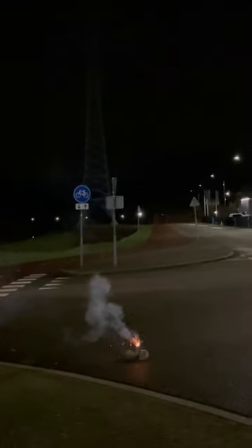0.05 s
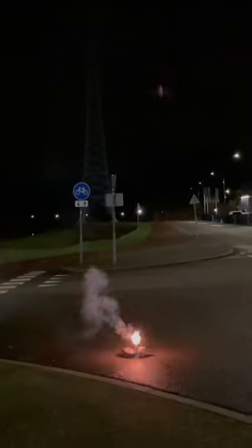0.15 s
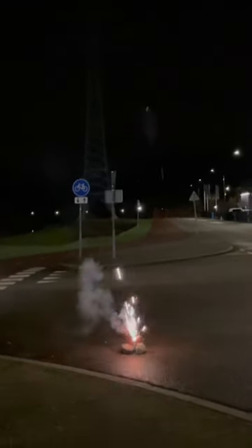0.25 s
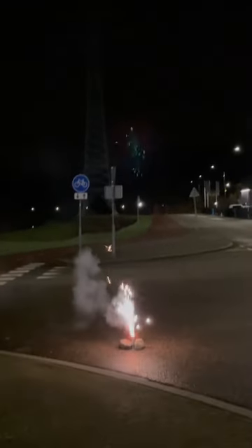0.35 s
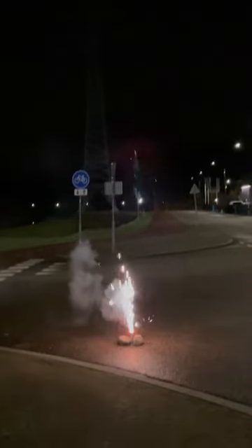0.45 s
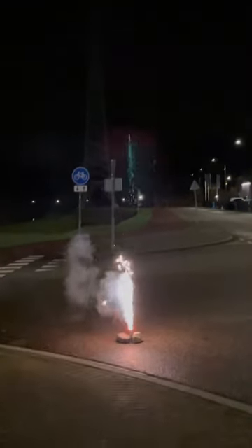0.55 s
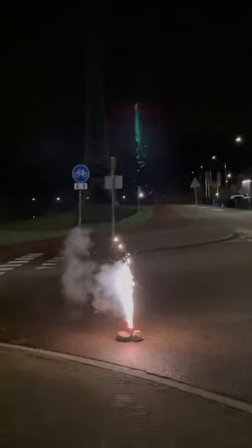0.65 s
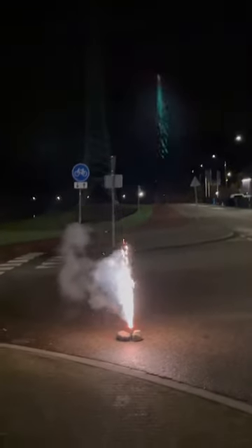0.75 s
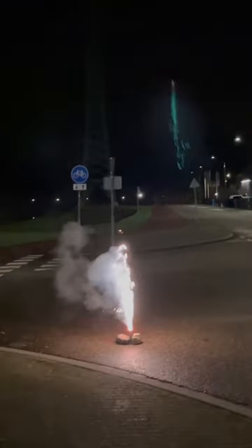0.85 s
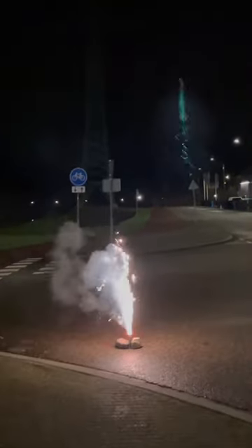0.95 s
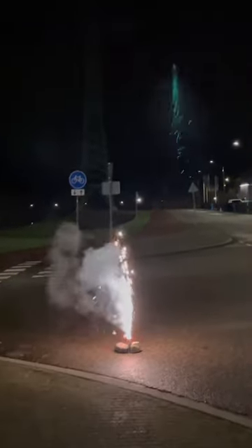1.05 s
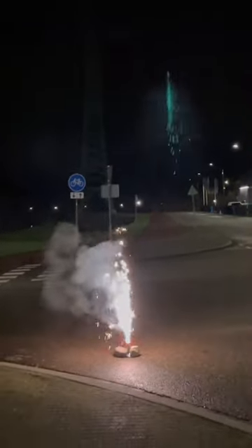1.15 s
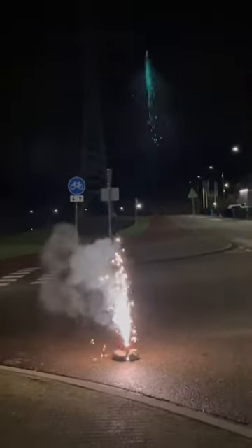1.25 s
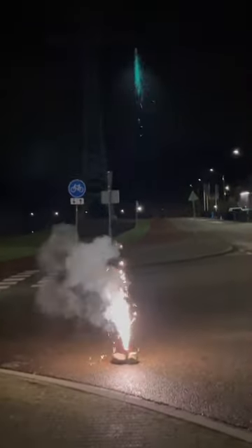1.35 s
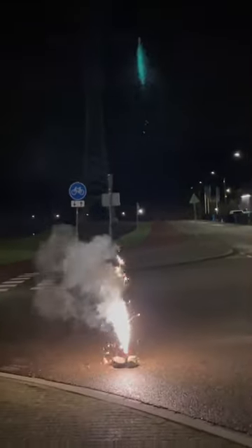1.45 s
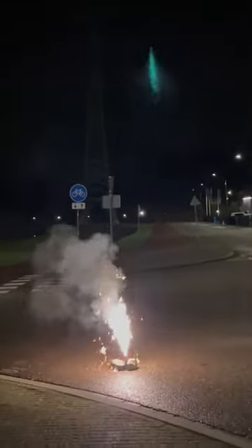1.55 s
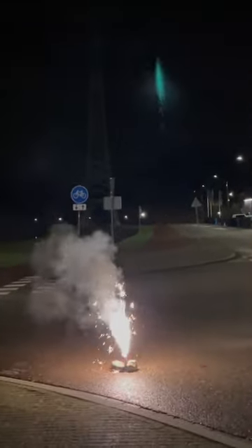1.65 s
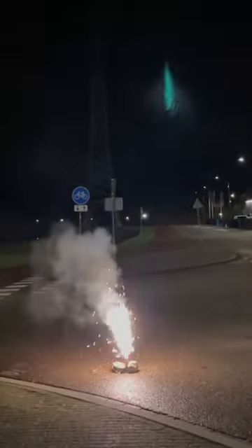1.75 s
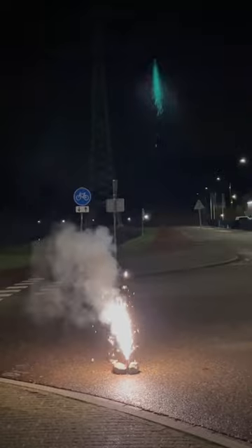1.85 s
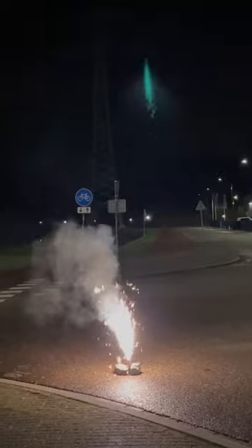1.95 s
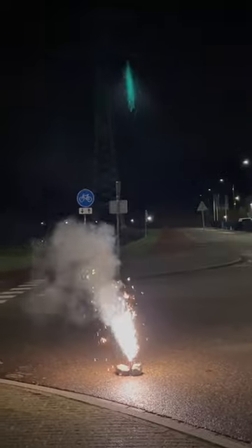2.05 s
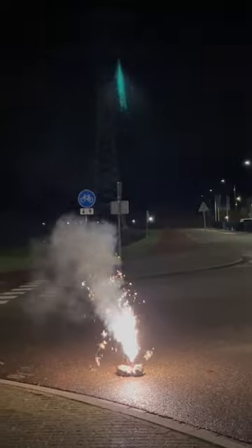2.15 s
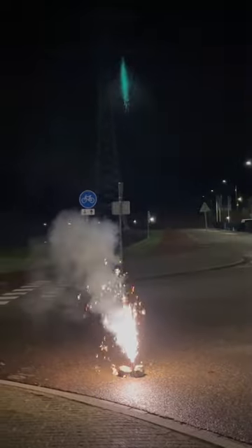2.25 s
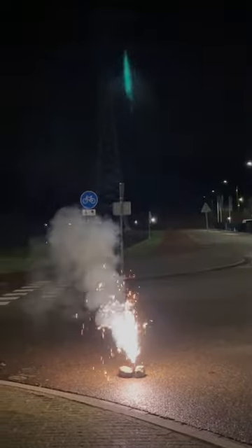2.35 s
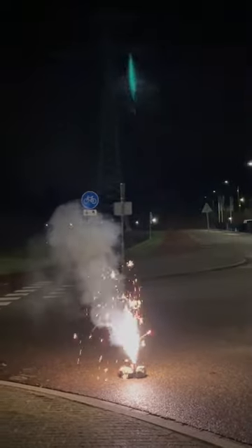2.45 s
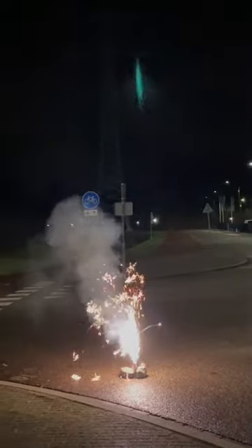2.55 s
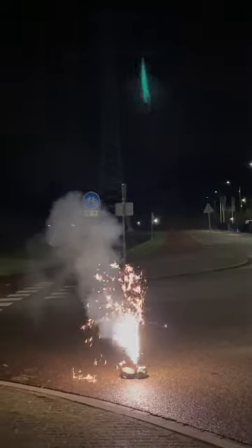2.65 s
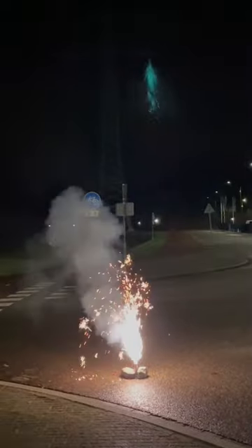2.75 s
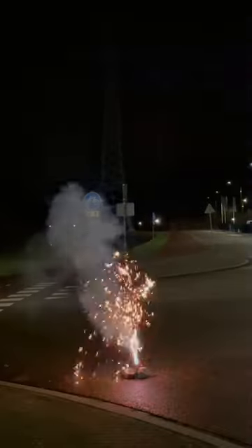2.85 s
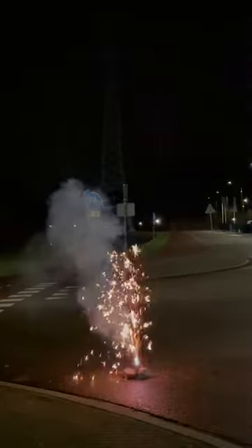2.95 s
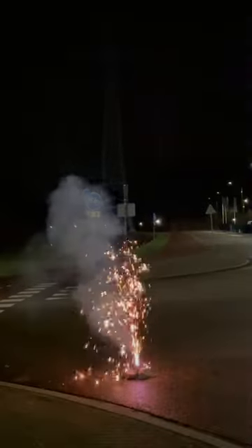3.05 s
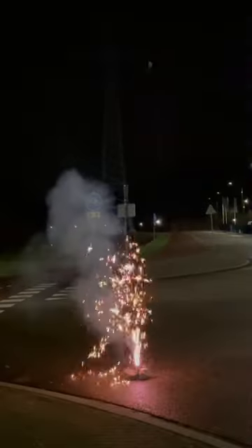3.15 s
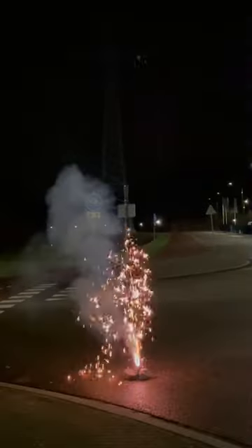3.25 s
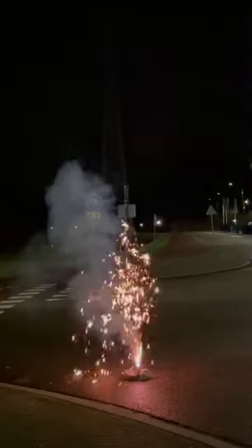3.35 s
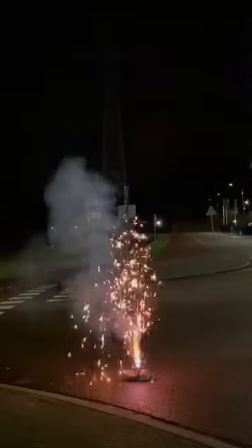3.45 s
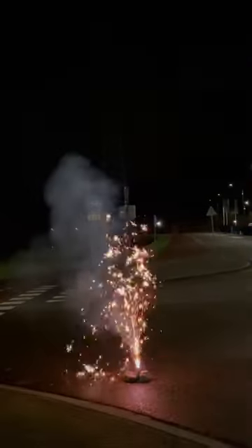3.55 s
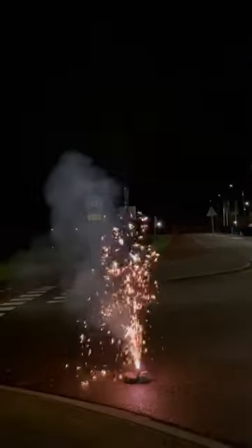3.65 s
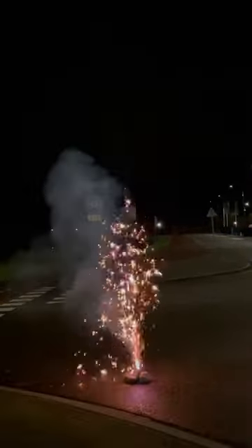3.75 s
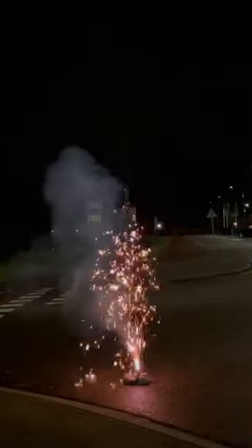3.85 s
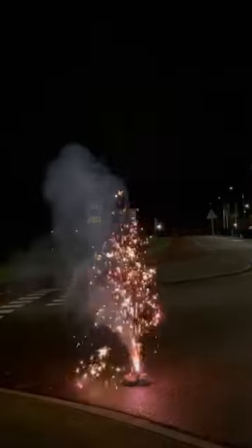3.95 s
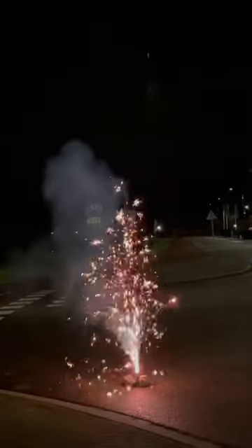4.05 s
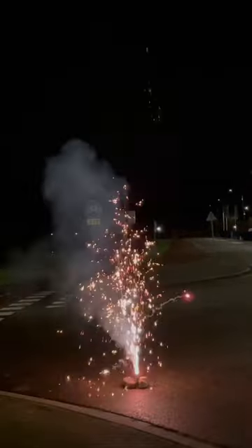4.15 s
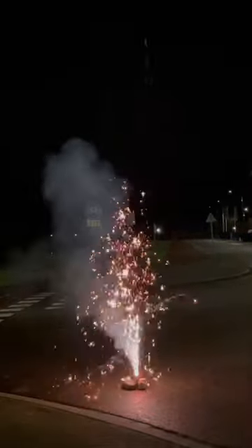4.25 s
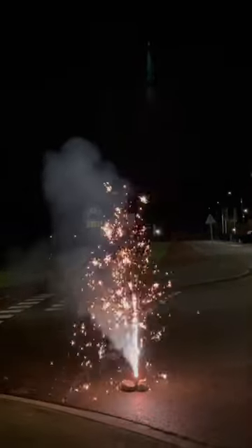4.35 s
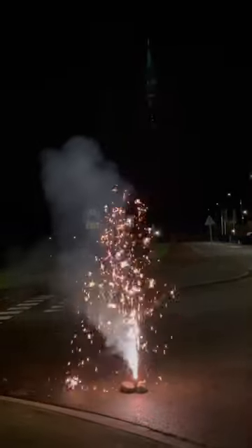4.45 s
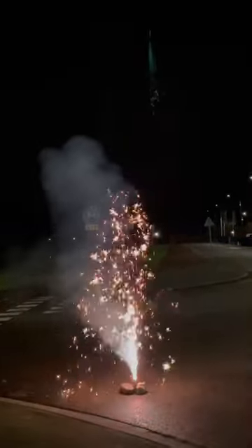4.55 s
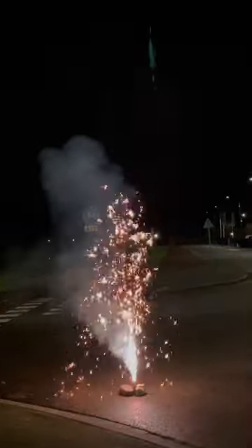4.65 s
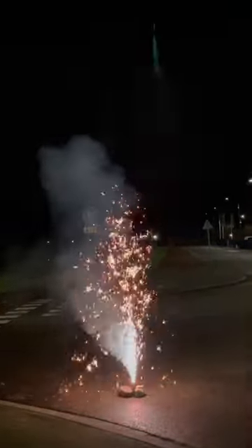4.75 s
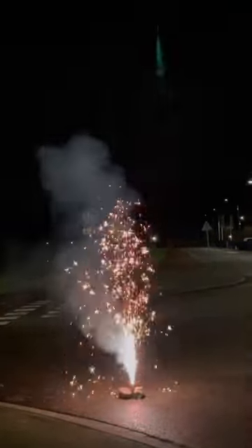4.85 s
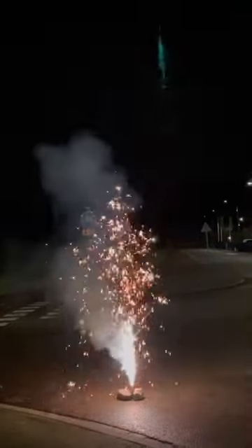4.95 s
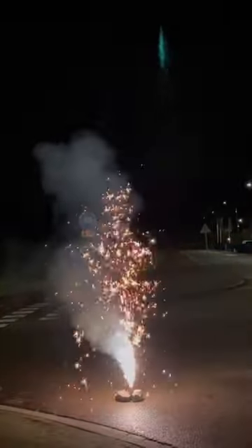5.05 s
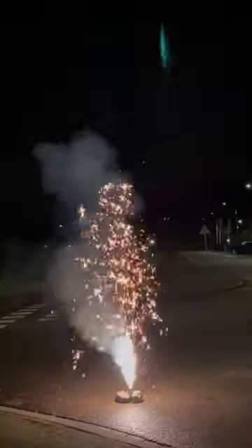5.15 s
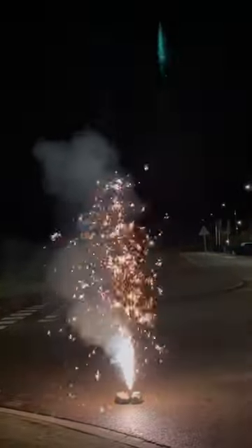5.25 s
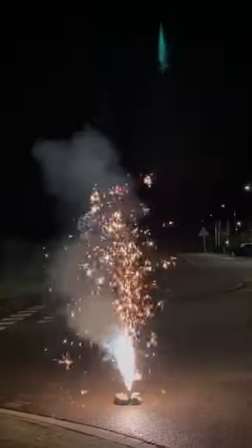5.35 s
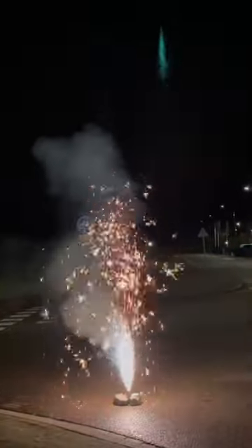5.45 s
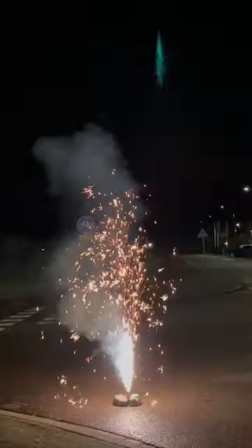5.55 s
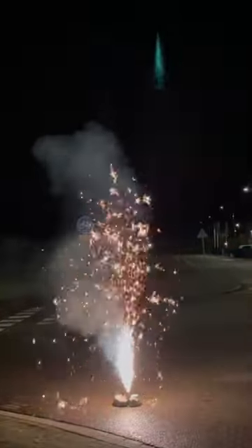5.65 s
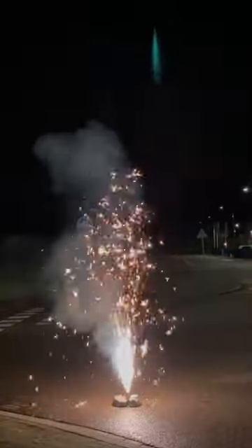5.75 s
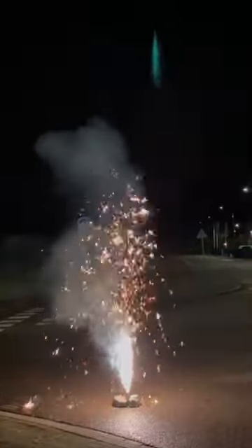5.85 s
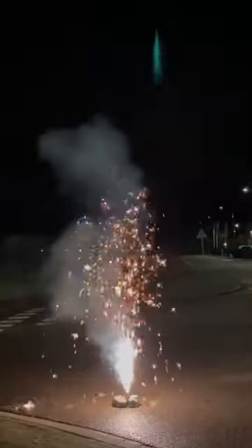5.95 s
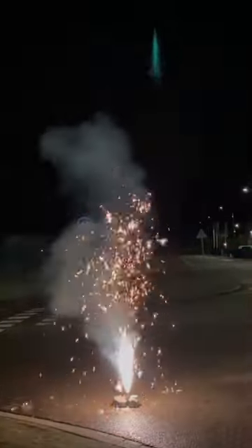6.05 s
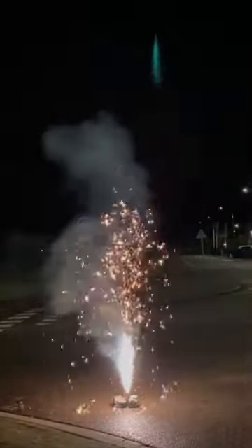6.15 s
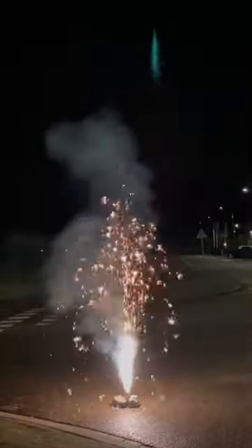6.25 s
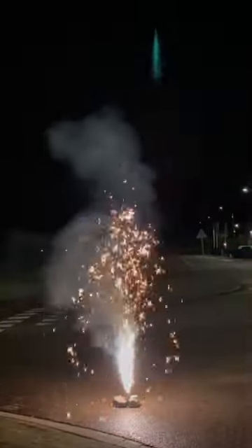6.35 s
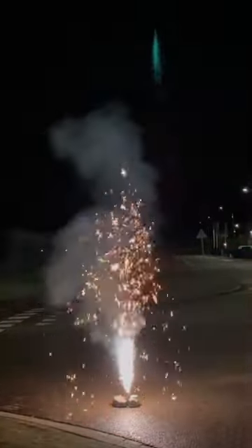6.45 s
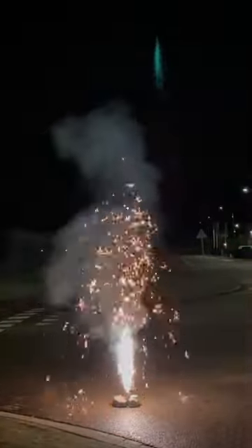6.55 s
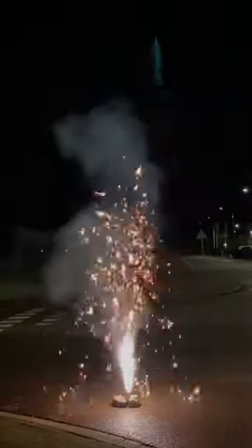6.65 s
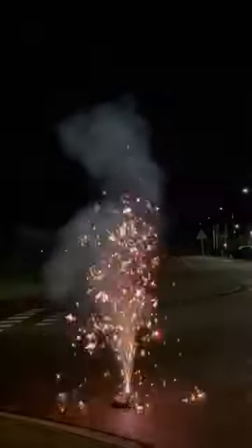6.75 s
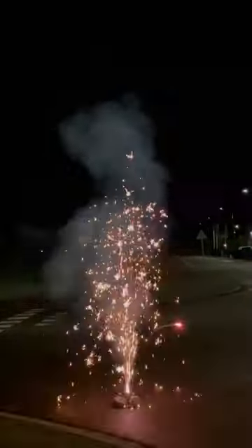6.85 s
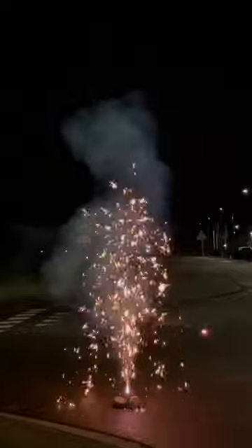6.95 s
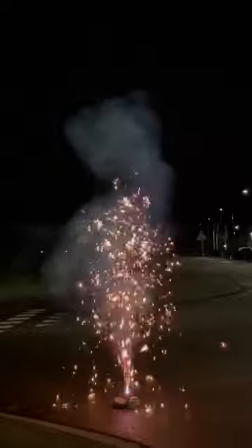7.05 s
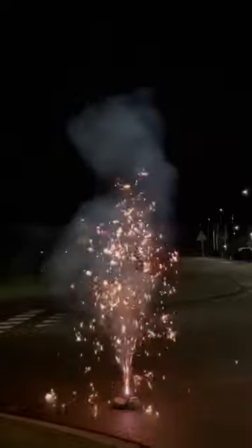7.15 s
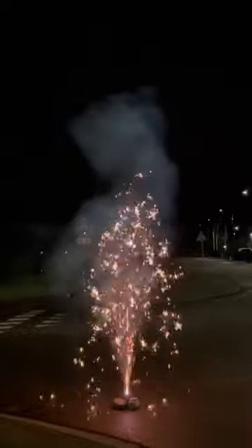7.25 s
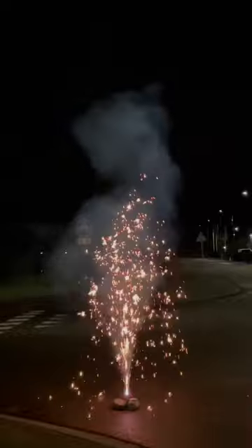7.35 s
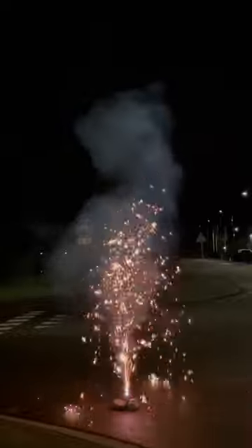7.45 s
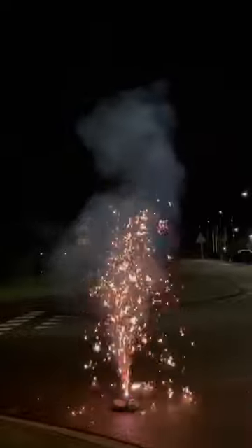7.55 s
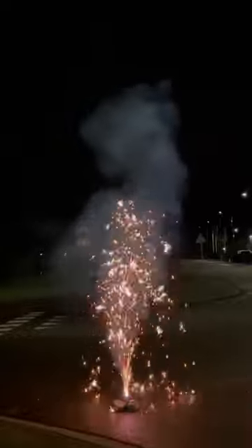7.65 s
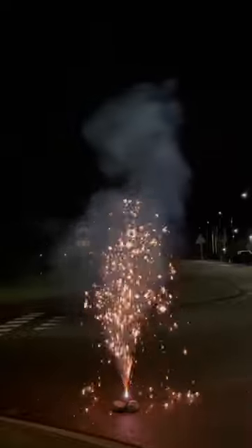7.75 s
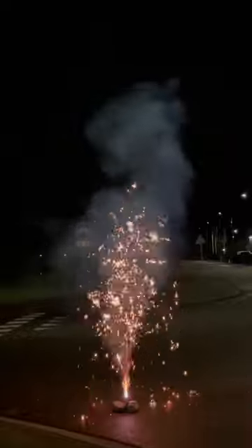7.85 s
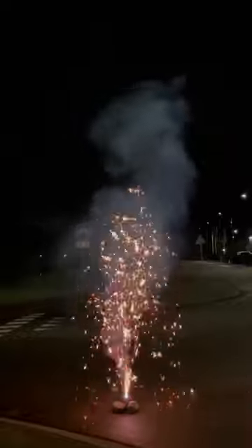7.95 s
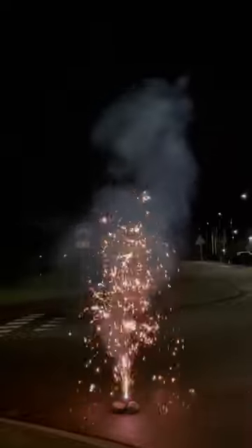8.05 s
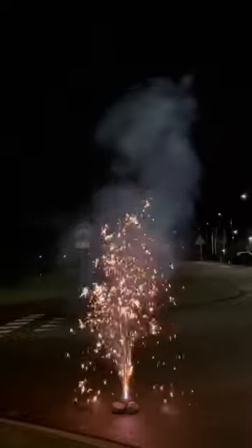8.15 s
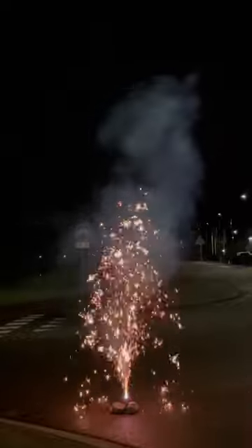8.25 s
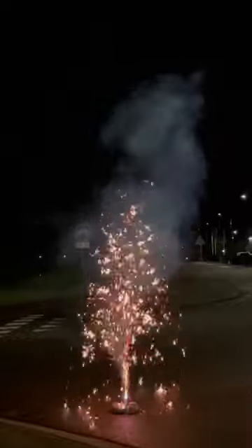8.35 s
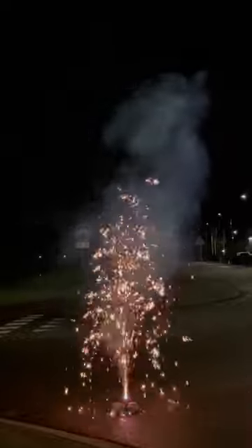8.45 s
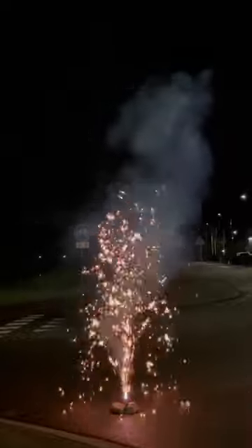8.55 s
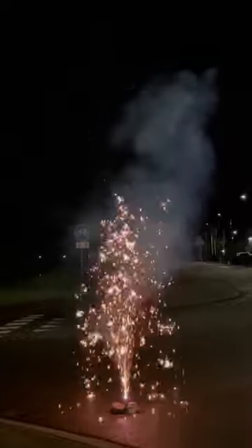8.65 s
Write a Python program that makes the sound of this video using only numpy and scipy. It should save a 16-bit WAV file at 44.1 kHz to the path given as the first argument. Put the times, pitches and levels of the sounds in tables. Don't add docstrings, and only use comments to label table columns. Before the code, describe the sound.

Outdoors at night, a fizzing fountain firework screams twice in falling tones, with a sputter and far low thud between, then hisses on.

```python
import sys
import numpy as np
from scipy import signal
from scipy.fft import rfft, irfft, next_fast_len
from scipy.io import wavfile
from scipy.ndimage import uniform_filter1d

SR = 44100
rng = np.random.default_rng(int(sys.argv[2]) if len(sys.argv) > 2 else 0)


def field_ratio(decibels):
    return 10 ** (np.asarray(decibels, dtype=float) / 20)


def output_pcm(signal):
    pcm = np.clip(np.atleast_2d(signal).T, -1, 1) * 32767
    wavfile.write(sys.argv[1], SR, np.round(pcm).astype(np.int16))


N = 383669
TIME = np.arange(N) / SR


def evened(x):
    return x / np.sqrt(np.mean(np.abs(x) ** 2) + 1e-20)


def read(points, hz):
    f, value = np.transpose(points)
    return np.interp(np.log(hz + 1), np.log(f + 1), value)


def per_hz(colour, lo_hz, hi_hz):
    hz = np.arange(lo_hz, hi_hz)
    return -10 * np.log10(np.sum(field_ratio(read(colour, hz)) ** 2))


def wander(count, hz):
    r = np.exp(-2 * np.pi * hz / SR)
    steps = rng.standard_normal((count, 2)) @ [1, 1j]
    return evened(signal.lfilter([1], np.convolve([1, -r], [1, -r]), steps))


# f/Hz, likeness/0-1
PORT_LIKENESS = [(60, 0.62), (150, 0.88), (380, 0.73), (950, 0.89), (2380, 0.84), (5980, 1), (15000, 1)]


def noise(field_db, size, patchy_db, flicker_db):
    hop = size // 4
    hz = np.fft.rfftfreq(size, 1 / SR)[:, None]
    t = np.arange(N // hop + 5) * hop / SR
    a, b, c, d, patches = rng.standard_normal((len(t), len(hz), 5)).T
    patches = evened(uniform_filter1d(uniform_filter1d(patches, 6, 0), 16, 1))
    flicker = evened(uniform_filter1d(rng.standard_normal(len(t)), 4))
    same = np.clip(read(PORT_LIKENESS, hz), 0, 1)
    left, other = a + 1j * b, c + 1j * d
    z = np.array([left, same * left + np.sqrt(1 - same ** 2) * other])
    level_db = field_db(hz, t) + patchy_db * patches + flicker_db * flicker
    z *= field_ratio(level_db) * np.sqrt(SR / size * 3 / 2)
    return signal.istft(z, nperseg=size, noverlap=size - hop)[1][:, :N]


# t/s, f/Hz, level/dB
KINDLE = [
    [(.45, 6300, -70.5), (.75, 6150, -49), (1.0, 5770, -44), (1.15, 5570, -35.5), (1.29, 5450, -26),
     (1.36, 5340, -30), (1.45, 5120, -28.5), (1.52, 5056, -21), (1.628, 5000, -12.5)],
    [(4.3, 6200, -67.5), (4.6, 5900, -48), (4.82, 5720, -37.5), (5.05, 5510, -30.5), (5.13, 5450, -20.5),
     (5.236, 5190, -20.5), (5.242, 5350, -23), (5.289, 5200, -19.5)],
]
# t/s, f/Hz, level/dB
SING = [
    [(1.634, 5253, -16.5), (1.732, 5036, -12), (1.738, 5087, -12), (2.09, 4730, -11), (2.4, 4400, -14),
     (2.69, 4204, -15), (2.725, 4124, -13.5), (2.798, 4090, -20)],
    [(5.294, 5380, -16), (5.33, 5290, -15.5), (5.8, 4764, -9), (6.27, 4360, -13.5), (6.5, 4158, -13.5),
     (6.6, 4030, -14.5), (6.645, 4020, -17), (6.668, 4023, -29.5), (6.84, 4030, -45)],
]
# level/dB, level/dB, flame falters t/s
STEEPEN = [
    (-21.5, -31.5, 2.745),
    (-13, -22.5, 6.63),
]
STEEP_PER_DB = (0.42, -0.3)
STEEP_DB_PER_KHZ = (-1.5, -11)
# t/s, depth/dB, pitch sag/Hz, length/s
CHOKES = [(1.631, 18, 750, .0022), (1.735, 4, 260, .0015), (2.486, 6, 40, .003), (2.727, 9, 100, .005),
          (2.741, 6, -200, .002), (5.162, 5, 80, .003), (5.218, 6, 100, .002), (5.227, 6, 100, .002),
          (5.239, 10, 250, .002), (5.28, 9, 120, .003), (5.2925, 22, 60, .0028), (5.322, 3, 130, .002),
          (5.405, 3, 110, .002), (5.53, 4, 170, .0025), (5.739, 12, 300, .0025), (6.535, 4, 50, .003),
          (6.614, 5, 60, .003)]
# row of level/dB, row of lock/0-1
LOCKING = (-38, -29, -19), (0, .72, .97)
# row of level/dB, row of wide share/0-1
NARROWING = (-45, -34), (1, .01)


def whistle(kindle, sing, steepen):
    s, hz, db = np.transpose(list(kindle) + list(sing))
    t = TIME[round(s[0] * SR):round(s[-1] * SR)]
    count, sing_s, falter_s = len(t), sing[0][0], steepen[2]
    tube_hz, tone_db = np.interp(t, s, hz), np.interp(t, s, db)

    at, depth_db, sag_hz, length_s = np.transpose(CHOKES)[:, :, None]
    choke_db = (depth_db * np.exp(-((t - at) / length_s) ** 2)).sum(0)
    sag = np.exp(-((t - at + 0.0013) / length_s) ** 2)
    pitch_hz = tube_hz - (sag_hz * sag).sum(0)
    for depth_hz, rate_hz in ((14, 14), (9, 100), (12, 370)):
        pitch_hz = pitch_hz + depth_hz * wander(count, rate_hz).real

    lock = np.where(t > sing_s, 0.99, np.interp(tone_db, *LOCKING))
    wide = np.interp(tone_db, *NARROWING)
    hum = np.sqrt(1 - wide) * wander(count, 140) + np.sqrt(wide) * wander(count, 620)
    wave = (np.sqrt(lock) + np.sqrt(1 - lock) * hum) * field_ratio(-choke_db)
    phase = 2 * np.pi * np.cumsum(pitch_hz) / SR + np.angle(wave)

    soft_db = -5 * ((t < sing_s) + 2.5 * np.clip((t - falter_s) / 0.042, 0, 1))
    levels_db = [tone_db]
    for under_db, grow, tilt in zip(steepen, STEEP_PER_DB, STEEP_DB_PER_KHZ):
        steep_db = under_db + grow * (tone_db + 12) + tilt * (tube_hz - 4600) / 1000
        levels_db.append(tone_db + steep_db + soft_db)
    tone = np.zeros(count)
    for k, level_db in enumerate(levels_db, 1):
        tone += field_ratio(level_db) * lock ** (k - 1) * abs(wave) ** k * np.sin(k * phase)
    out = np.zeros(N)
    out[round(s[0] * SR):][:count] = np.sqrt(2) * tone * np.clip((t[-1] - t) / 0.0053, 0, 1)
    return out


def street(x):
    t = np.arange(SR) / SR
    taps = rng.standard_normal((2, SR)) * (rng.random((2, SR)) < .4)
    taps[1] = 0.52 * taps[0] + 0.5 * taps[1]
    decay = field_ratio(-60 * t / .28) + field_ratio(-16 - 60 * t / 1.15)
    taps *= decay * np.clip((t - .015) / .03, 0, 1)
    dull = signal.lfilter(*signal.butter(N=2, Wn=9000, fs=SR), taps)
    return signal.fftconvolve(x[None], dull / np.linalg.norm(taps[0]), axes=1)[:, :N]


# f/Hz, level/dB per Hz
JET_COLOUR = [(880, -41.5), (1500, -29.5), (1610, -9), (2200, -17), (2580, -6.5), (3600, -3.5), (4020, -3),
              (4350, -1.5), (6640, -11), (8000, -1), (10600, -12.5), (13100, -13), (14600, -24),
              (15800, -36.5)]
# centre f/Hz, low f/Hz, high f/Hz
JET_BANDS = [
    (2850, 2400, 3300),
    (4750, 4300, 5200),
    (7350, 7000, 7700),
    (12300, 11300, 13500),
]
# t/s, level/dB
FOUNTAIN = [(.16, -62), (1.5, -61.5), (1.9, -57), (2.9, -54.5), (3.1, -56), (3.3, -51), (3.8, -49),
            (4.8, -48.5), (5.2, -45.5), (5.35, -53), (6.55, -57.5), (6.7, -48), (7.6, -50), (8.7, -50.5)]
# t/s, level/dB
FLAME = [
    [(.16, -62), (.28, -56), (.5, -61.5), (1.5, -60.5), (1.68, -51.5), (2.1, -56), (2.7, -57), (2.83, -58),
     (2.92, -74)],
    [(3.92, -79), (4.0, -53.5), (4.5, -54), (4.9, -56), (5.25, -53), (5.35, -49.5), (5.9, -51.5),
     (6.62, -51), (6.7, -68.5)],
]
FOUNTAIN_DB = (0, -1, -7, -11)
FLAME_DB = [(0, 7.6, -1.5, 1), (0, 6, -.3, 1.7)]


def jet():
    ripen_db_per_s, ripen_hz = 0.68, 6000

    def balance(hz, row_db):
        log_centres = np.log(np.array(JET_BANDS)[:, 0])
        levels_db = [db + per_hz(JET_COLOUR, lo, hi) for db, (_, lo, hi) in zip(row_db, JET_BANDS)]
        return field_ratio(np.interp(np.log(hz + 1), log_centres, levels_db))

    def field(hz, t):
        ripe_db = ripen_db_per_s * (t - 7) * np.clip(np.log2(hz / ripen_hz + .01) + 1, 0, 1)
        fountain_db = np.interp(t, *np.transpose(FOUNTAIN)) + ripe_db
        power = (balance(hz, FOUNTAIN_DB) * field_ratio(fountain_db)) ** 2
        for flame, row_db in zip(FLAME, FLAME_DB):
            flame_db = np.interp(t, *np.transpose(flame), -120, -120)
            power = power + (balance(hz, row_db) * field_ratio(flame_db)) ** 2
        return read(JET_COLOUR, hz) + 10 * np.log10(power) - np.clip((2000 - hz) / 40, 0, 60)

    hiss = noise(field, size=512, patchy_db=0.75, flicker_db=0.86)
    return hiss * np.clip((TIME - .15) / 0.0033, 0, 1)


# t/s, length/s, level/dB, low f/Hz, high f/Hz
SPITS = [
    (1.158, .06, -43, 1350, 2400),
    (1.158, .06, -50, 650, 1300),
    (2.719, .018, -29, 2800, 5100),
    (2.718, .022, -41, 11000, 14800),
    (2.735, .022, -45, 11000, 14500),
    (2.72, .028, -45, 7200, 10000),
    (2.722, .022, -53, 800, 2200),
    (4.4517, .0006, -39, 700, 10500),
    (1.63, .012, -50, 2500, 14000),
    (6.601, .01, -46, 5000, 15000),
]


def spits():
    out = np.zeros(N)
    for s, length_s, db, lo, hi in SPITS:
        shape = signal.windows.tukey(round(length_s * SR), .5)
        puff = np.pad(rng.standard_normal(len(shape)) * shape, (0, 300))
        band = signal.butter(N=3, Wn=[lo, hi], btype="band", fs=SR, output="sos")
        puff = signal.sosfilt(band, puff)
        out[round(s * SR):][:len(puff)] += field_ratio(db) * evened(puff)
    return out + .7 * np.roll(out, 10)


# f/Hz, width/Hz, level/dB
SPENT = [
    (4030, 87.3, -58),
    (8000, 320, -51.5),
]


def spent():
    spent_s = 6.7
    hum = np.zeros(N)
    for hz, width_hz, db in SPENT:
        fuzzy = (wander(N, width_hz) * np.exp(2j * np.pi * hz * TIME)).real
        hum += field_ratio(db + 5 * wander(N, 4.5).real) * fuzzy * np.sqrt(2)
    return hum * np.clip((TIME - spent_s) / 0.151, 0, 1)


# t/s, peak level/dB, f/Hz, t60/s
THUDS = [(0.829, -36.5, 52.4, 0.21), (2.68, -32, 51.6, 0.19), (2.678, -27, 138, 0.18),
         (2.768, -36, 75, 0.24), (2.815, -26.5, 159, 0.24), (2.838, -26.5, 157, 0.15),
         (2.889, -27.5, 133.5, 0.094), (2.908, -27, 169, 0.15), (2.948, -27.5, 101, 0.097),
         (2.99, -27, 118.6, 0.17), (3.015, -20.5, 154, 0.11), (3.061, -19, 196, 0.081),
         (3.108, -46, 191, 0.15), (3.16, -28, 156, 0.14), (3.228, -37.5, 111.5, 0.14),
         (3.296, -36.5, 181, 0.13), (3.381, -33.5, 155, 0.098), (3.439, -44, 165.4, 0.16),
         (5.757, -40.5, 142, 0.29), (6.127, -36.5, 99, 0.12), (6.429, -37, 51.5, 0.15)]
# t/s, peak level/dB, f/Hz, t60/s
KNOCKS = [
    (2.81, -33.5, 387.6, 0.17),
    (2.835, -30, 326.8, 0.16),
    (2.89, -37, 407, 0.19),
    (3.05, -31, 297, .15),
    (3.3, -30, 169, .15),
]


def thuds():
    out, t = np.zeros(N), np.arange(6000) / SR
    for s, db, hz, t60_s in list(THUDS) + list(KNOCKS):
        decay = field_ratio(db - 0.5 - 60 * t / t60_s)
        out[round(s * SR):][:len(t)] += np.sin(2 * np.pi * hz * t) * decay * np.clip(t / 0.0049, 0, 1)
    return out


# t/s, level/dB
ROLL = [
    (2.66, -40),
    (2.718, -38.5),
    (3.038, -30),
    (3.458, -42.5),
    (4.3, -54.5),
]
# f/Hz, level/dB per Hz
ROLL_COLOUR = [(18, -38.5), (30, -10.5), (167, -2), (245, -13.5), (356, -14), (583, -22), (633, -29),
               (800, -27), (1040, -55), (1760, -120)]


def roll_db(hz, t):
    s, db = np.transpose(ROLL)
    upper_db = -0.9 * np.clip((hz - 200) / 100, 0, 1)
    level_db = np.interp(t, s, db - 4.5, -120, -120)
    return read(ROLL_COLOUR, hz) + per_hz(ROLL_COLOUR, 50, 450) + level_db + upper_db - 60 * (hz > 800)


# t/s, swell/dB
TRAFFIC = [(0, 3.5), (.6, -3), (1, -1.5), (1.6, -2), (3.2, -2.5), (3.9, 3), (5.9, 1.5), (6.8, 0),
           (8.7, -3.5)]
# f/Hz, level/dB per Hz
RUMBLE_COLOUR = [(8.8, -55), (15, -15), (43, -3.5), (75, -5), (137, -5.5), (291, -11), (500, -10),
                 (650, -39), (1100, -120)]
# f/Hz, level/dB per Hz
WASH_COLOUR = [(150, -45), (250, -15), (340, -4.5), (420, -6.5), (798, -3), (1600, -12), (2300, -22.5),
               (2990, -50), (5060, -120)]


def traffic_db(hz, t):
    rumble_db, wash_db, wash_share = -53, -52.5, 0.38
    swell_db = np.interp(t, *np.transpose(TRAFFIC))
    rumble = read(RUMBLE_COLOUR, hz) + per_hz(RUMBLE_COLOUR, 30, 300) + rumble_db + swell_db
    wash = read(WASH_COLOUR, hz) + per_hz(WASH_COLOUR, 600, 1200) + wash_db + wash_share * swell_db
    wash = wash - 9 * np.clip(1 - t / 0.32, 0, 1)
    return rumble - 60 * (hz > 330), wash - 60 * (hz <= 330)


# f/Hz, level/dB per Hz
NIGHT = [(880, -40), (1500, -20.5), (5090, -12), (6130, -11.5), (7110, -21), (14600, -13.5), (15800, -29)]


def town():
    night_db = -62

    def field(hz, t):
        night = read(NIGHT, hz) + per_hz(NIGHT, 1500, 15900) + night_db - 60 * (hz < 1500)
        rumble, wash = traffic_db(hz, t)
        return 10 * np.log10(sum(field_ratio(db) ** 2 for db in (night, rumble, wash, roll_db(hz, t))))

    return noise(field, size=2048, patchy_db=1.5, flicker_db=0.2)


def scene():
    direct = sum(whistle(*charge) for charge in zip(KINDLE, SING, STEEPEN)) + spits()
    return direct + field_ratio(-14.5) * street(direct) + jet() + spent() + thuds() + town()


def masked(x):
    mask_db, slope_db_per_khz = 28, 13.5
    hz, t, z = signal.stft(x, SR, nperseg=2048)
    bands = z[:, :1024].reshape(2, 64, 16, -1)
    index = np.arange(64)[:, None]
    level_db = 10 * np.log10((abs(bands) ** 2).sum((0, 2)) + 1e-20)
    fade_db = slope_db_per_khz * index * 16 * hz[1] / 1000
    reach_db = np.maximum.accumulate(level_db + fade_db, 0) - fade_db - mask_db
    reach_db = np.roll(reach_db, shift=2, axis=0)
    reach_db = reach_db + 3.8 * rng.standard_normal(reach_db.shape)
    keep = (level_db > reach_db) | (index < 15)
    z[:, :1024] = (bands * keep[:, None]).reshape(2, 1024, -1)
    return signal.istft(z, SR, nperseg=2048)[1][:, :N]


def top_cut(x):
    return signal.sosfilt(signal.butter(12, 15940, fs=SR, output="sos"), x)


# f/Hz, left over right/dB
TILT = [(60, -3.5), (120, 1), (240, -1.5), (480, -3), (950, -7), (1890, -2), (3770, -3), (7520, -1),
        (15000, 5)]
# f/Hz, lead/rad
LEAD = [(0, 0.48), (1210, 0.21), (2150, -0.63), (2930, -0.7), (3880, -0.4), (4480, -0.88), (4740, -0.51),
        (5940, -0.8), (6290, -1.1), (7410, -0.73), (7750, -0.76), (8610, -0.72), (9040, 0.67),
        (15500, -0.0)]


def record(dry):
    size = next_fast_len(N)
    hz = np.fft.rfftfreq(size, 1 / SR)
    half = field_ratio(read(TILT, hz) / 2) * np.exp(.5j * read(LEAD, hz))
    ports = irfft(rfft(dry, size) * np.array([half, 1 / half]), size)[:, :N]
    mix = masked(ports)
    return top_cut(mix)


dry = scene()
out = record(dry)
output_pcm(out)
```